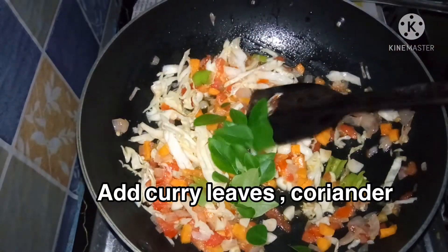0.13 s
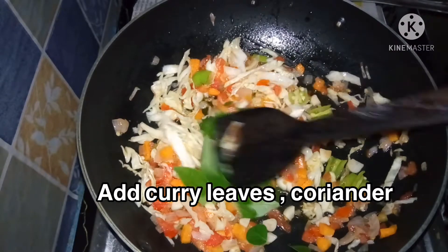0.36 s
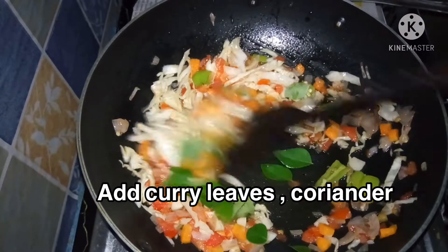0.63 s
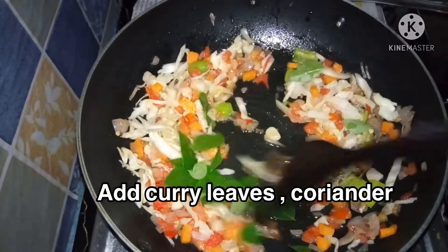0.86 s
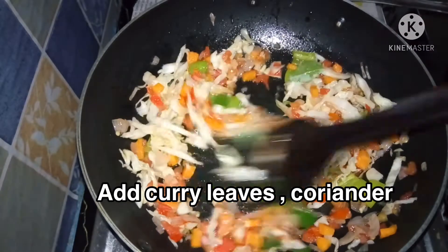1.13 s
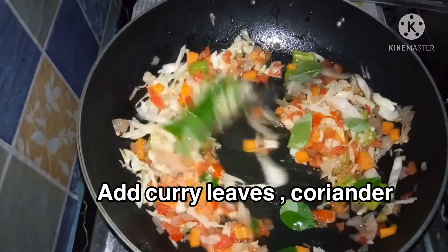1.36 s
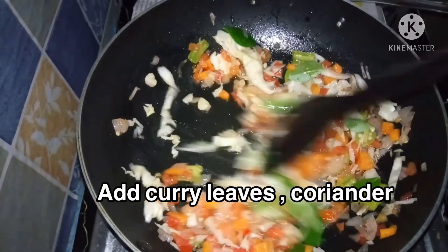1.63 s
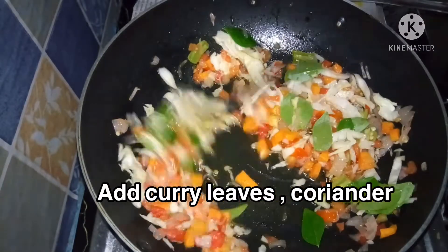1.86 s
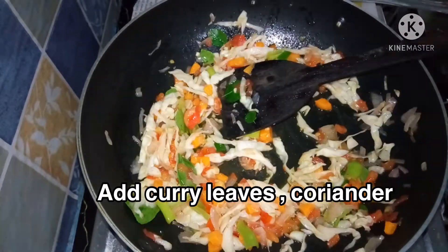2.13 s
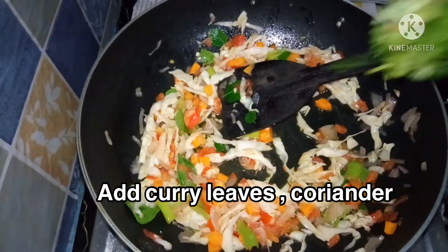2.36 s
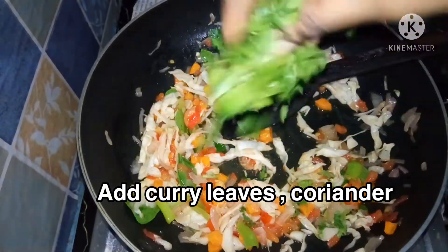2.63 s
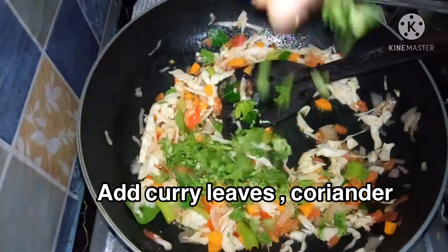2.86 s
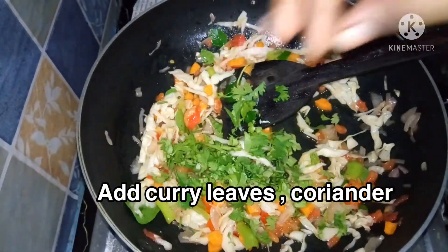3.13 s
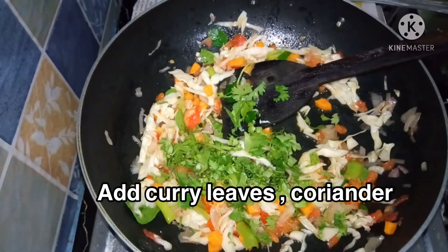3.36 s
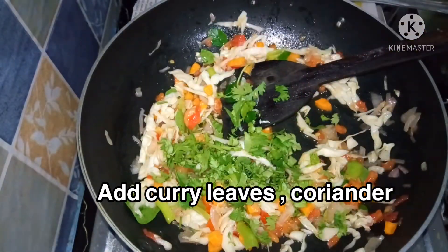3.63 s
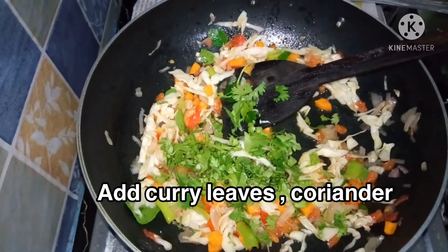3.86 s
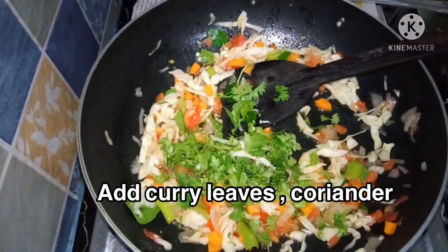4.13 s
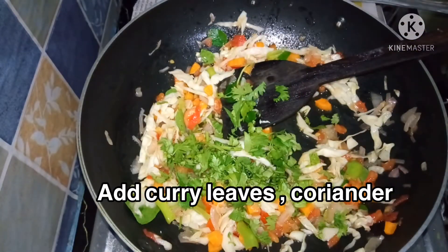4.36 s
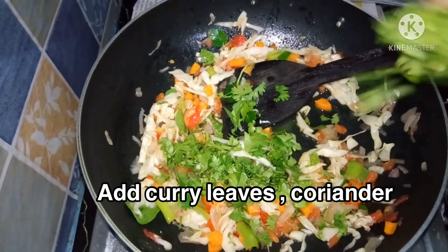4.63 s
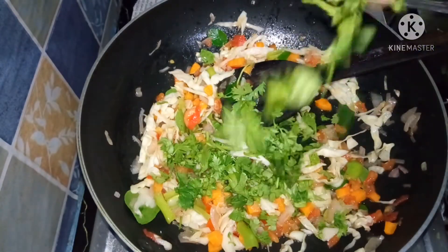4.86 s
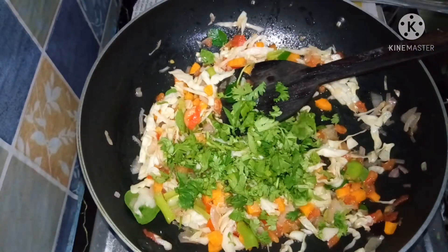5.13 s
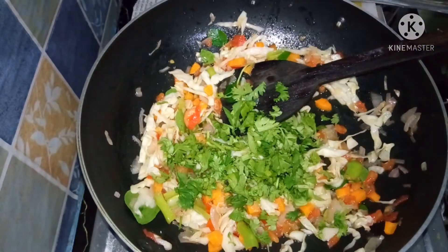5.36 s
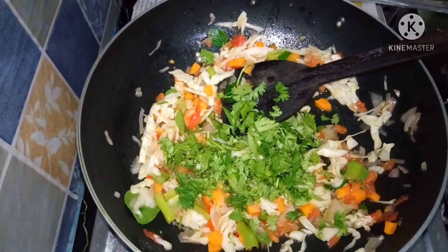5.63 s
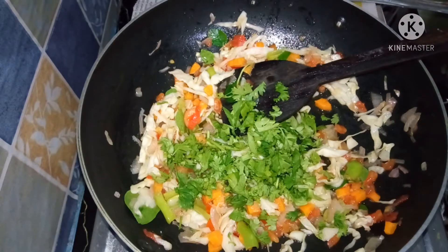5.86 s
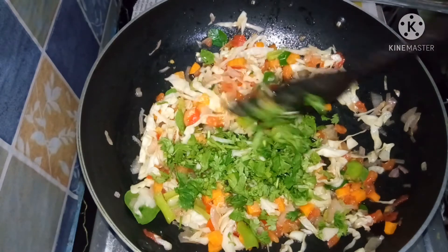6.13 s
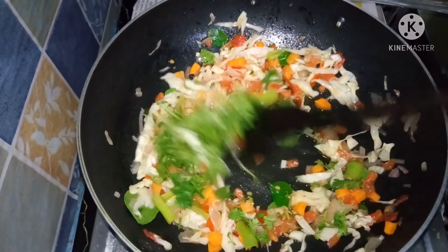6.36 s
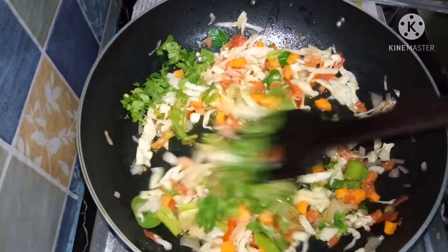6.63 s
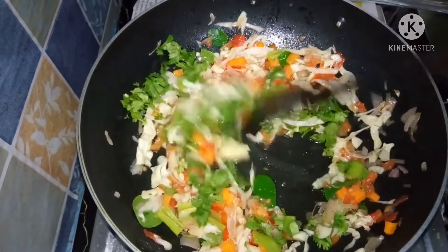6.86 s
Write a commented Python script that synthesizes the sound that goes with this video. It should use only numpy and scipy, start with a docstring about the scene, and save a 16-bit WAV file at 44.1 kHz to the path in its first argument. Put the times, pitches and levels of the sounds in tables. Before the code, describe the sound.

Close in a small kitchen, chopped vegetables sizzle brightly over a faint burner roar. A wooden spatula taps and scrapes the wok, ringing it briefly. Around two seconds the sound dips almost to silence and returns to undisturbed sizzling with snapping fat pops. Near six seconds something hard clacks down at the left, then the stirring knocks resume, ending on a heavy scrape. Phone-like stereo pickup.

```python
"""Vegetables sizzle in a wok: thousands of tiny steam bursts, coloured and unsteady, flaring now and then.
A burner roars low as filtered noise; fat pops as pitched blips; a wooden spatula taps the pan (decaying modes)
and scrapes it (grainy noise); something clacks on the counter (a resonant click) and the wok shifts on its stand.
A phone hears it at two ports of different colour and opposite polarity. An edit fades the sound out and in once."""
import sys
import numpy as np
from scipy import signal
from scipy.fft import rfft, irfft, next_fast_len
from scipy.io import wavfile
from scipy.ndimage import uniform_filter1d, map_coordinates

SR = 44100
rng = np.random.default_rng(int(sys.argv[2]) if len(sys.argv) > 2 else 0)


def level_to_linear(level):
    """Convert decibel levels to linear amplitude factors, elementwise."""
    exponent = np.asarray(level, float) / 20
    return 10 ** exponent


def waveform_to_disk(signal):
    """Save audio, clipped to [-1, 1], as 16-bit WAV at the path in sys.argv[1]."""
    frames = np.transpose(np.atleast_2d(signal))
    scaled = np.clip(frames, -1, 1) * 32767
    samples = np.round(scaled).astype(np.int16)
    wavfile.write(sys.argv[1], SR, samples)


N = 308259  # length in samples

# the bare wok's modes, the first two being one mode split in two: pitch_hz [Hz], level_db [dB], t60_s [s]
WOK_MODES = [(550.6, 0, 0.3), (594.3, -0.5, 0.21), (144.3, -20, 0.45), (303, -20, 0.14),
             (483.86, -14.5, 0.072), (653, -9, 0.045), (745, -7.5, 0.14), (818, -6.5, 0.045),
             (920, -11.5, 0.033), (1096.1, -11.5, 0.063), (1195.6, -5.5, 0.086), (1271.1, -14, 0.18),
             (1397.8, -9, 0.03548), (1800.6, -18, 0.063), (2525, -13.5, 0.034), (4340, -25, 0.04)]
# the edit: time_s [s], fade_out_s [s], fade_in_s [s]
EDIT = (2.07, 0.081, 0.16)


def unit(x):
    """Scaled to rms 1."""
    return x / np.sqrt(np.mean(x ** 2) + 1e-20)


def along(points, hz):
    """(Hz, value) points read on a log frequency axis."""
    f, v = np.transpose(points)
    return np.interp(np.log(hz + 1), np.log(f + 1), v)


def wobble(rate):
    """A smooth random curve with rate knots a second."""
    knots = rng.standard_normal(int(N * rate / SR) + 4)
    return map_coordinates(knots, [np.arange(N) * rate / SR])


def filtered(x, response):
    """x filtered by a complex response of frequency."""
    m = next_fast_len(N + SR // 2)
    return irfft(rfft(x, m) * response(np.fft.rfftfreq(m, 1 / SR)), m)[..., :N]


def resonant(peaks):
    """Causal response of (Hz, width Hz, dB) resonances, summed with alternating sign."""
    def response(f):
        return sum((-1) ** k * level_to_linear(db) * 1j * f * width / (hz * hz - f * f + 1j * f * width)
                   for k, (hz, width, db) in enumerate(peaks))
    return response


def pan_body(hardness_db=0):
    """The wok as resonances; a harder contact (dB per octave) favours the high modes."""
    first_hz = WOK_MODES[0][0]  # hardness tilts about the first listed mode
    return resonant([(hz, np.log(1000) / np.pi / t60, db + hardness_db * np.log2(hz / first_hz))
                     for hz, db, t60 in WOK_MODES])


def patchy(patchy_db):
    """Two unrelated noises under shared time-frequency patches of random gain."""
    z = signal.stft(rng.standard_normal((2, N)), nperseg=256)[2]
    field = uniform_filter1d(rng.standard_normal(z.shape[1:]), size=5, axis=0)
    field = uniform_filter1d(field, size=8, axis=1)
    return unit(signal.istft(z * level_to_linear(patchy_db * unit(field)), nperseg=256)[1][:, :N])


def bursts(count, spread_db, lag_spread):
    """Tiny bursts all over the pan, each with its own lag (samples) and strength between the ports."""
    at = rng.uniform(0, N - 1, count)
    size = rng.choice([-1, 1], count) * level_to_linear(spread_db * np.minimum(rng.exponential(1, count), 5.5))
    lag = lag_spread * rng.standard_normal(count)
    side_db = 3 * rng.standard_normal(count)

    def place(shift, db):
        return np.bincount(np.clip(at + shift, 0, N - 1).astype(int), size * level_to_linear(db), N)
    return unit(np.array([place(lag, side_db), place(0, -side_db)]))


def kitchen(x):
    """The room's answer: a noise tail in which each frequency dies at its own speed."""
    # the room's tail: pitch_hz [Hz], t60_s [s]
    room_decay = [(300, 0.2), (2000, 0.2487), (8000, 0.05)]
    hz, t, z = signal.stft(rng.standard_normal((2, SR // 2)), SR, nperseg=256)
    tail = signal.istft(z * level_to_linear(-60 * t / along(room_decay, hz)[:, None]), SR, nperseg=256)[1]
    late = np.pad(x, (200, 0))[None]
    return signal.fftconvolve(late, tail / np.linalg.norm(tail[0]), axes=1)[:, :N]


def sizzle():
    """Clumped bubble bursts of three sizes over a finer hiss; they also shake the pan a little."""
    # colour of the bursting steam bubbles: pitch_hz [Hz], gain_db [dB]
    fizz_colour = [(500, -35.5), (900, -25), (1200, -13), (1500, -18.5), (1900, -8.5), (2400, -14.5),
                   (3500, -10), (4300, -12), (5700, -7.5), (7600, 0.5), (9000, -4.5), (10600, -15.5),
                   (13000, -20.5), (15700, -21.5), (15900, -120)]
    # extra colour before the edit: pitch_hz [Hz], gain_db [dB]
    early_colour = [(400, 9), (1500, -2.5), (5000, -2), (10000, 0)]
    # wet food meets hot metal and the sizzle flares, or is lifted off and it sinks:
    # top_s [s], change_db [dB], length_s [s]
    flares = [(0.27, 1.5, 0.12), (0.56, 4, 0.084), (0.76, 3, 0.2), (1.293, 3, 0.084), (1.459, 3, 0.062),
              (1.687, 2, 0.1), (1.863, -1.5, 0.0487), (1.924, 4, 0.024), (4.31, 2.5, 0.13),
              (5.368, 1, 0.037), (6.46, 1, 0.057), (6.657, -3, 0.11), (6.769, 3.5, 0.063),
              (6.945, 4, 0.075)]
    rise_share = 0.61  # a flare rises in this share of the time it takes to fall
    # level before the edit; level just after it, climbing as the resting food heats through
    stirred_db, resting_db, heats_db_per_s = -41.5, -43.5, 0.43

    t = np.arange(N) / SR
    before_edit = t < EDIT[0]
    strength_db = np.where(before_edit, stirred_db, resting_db + heats_db_per_s * (t - EDIT[0]))
    for s, db, length in flares:
        side = np.where(t < s, rise_share, 1)
        strength_db = strength_db + db * np.exp(-((t - s) / length / side) ** 2)

    steam = 1.42 * patchy(patchy_db=2.5)
    for bubble_hz, bubble_db in (2500, 2.6), (5000, 6.4), (8000, 0.82):  # small bubbles ring higher
        clumps = level_to_linear(0.94 * wobble(30) + 1.0 * wobble(150))
        crowd = clumps * bursts(count=15000, spread_db=2, lag_spread=6)
        steam = steam + filtered(crowd, resonant([(bubble_hz, 0.49 * bubble_hz, bubble_db)]))
    unsteady_db = 0.54 * wobble(6.5) + 0.49 * wobble(20) + 0.3911 * wobble(40) + 0.35 * wobble(200)
    steam = level_to_linear(unsteady_db) * steam

    fizz = unit(filtered(steam, lambda hz: level_to_linear(along(fizz_colour, hz))))
    shaken_pan = unit(filtered(steam[1], pan_body(hardness_db=18.5)))
    fizz = fizz + level_to_linear(-43.5) * shaken_pan
    early = filtered(fizz, lambda hz: level_to_linear(along(early_colour, hz)))
    return level_to_linear(strength_db) * np.where(before_edit, early, fizz)


def roar():
    """Burner and kitchen: a low unsteady noise, nearly the same at both ports."""
    # colour of burner and kitchen: pitch_hz [Hz], gain_db [dB]
    roar_colour = [(20, -22), (60, -12.5), (105, -4), (143, -1.5), (190, -4.5), (270, -8), (400, -8),
                   (700, -8), (1300, -9), (2500, -35)]
    # level before the edit and after it: before_db [dB], after_db [dB]
    roar_levels = (-61, -58)
    a, b = filtered(patchy(patchy_db=2.5), lambda hz: level_to_linear(along(roar_colour, hz)))
    level_db = np.where(np.arange(N) / SR < EDIT[0], *roar_levels)
    level_db = level_db + 0.64 * wobble(2.9) + 0.58 * wobble(8.6)
    return level_to_linear(level_db) * unit(np.array([a + 0.2789 * b, a - 0.26 * b]))


def pops():
    """Single bursts of fat: a few cycles at the bubble's pitch over a duller body."""
    # loud fat pops: start_s [s], level_db [dB], pitch_hz [Hz]
    loud_pops = [(0.1062, -24, 7540), (0.5167, -26, 7800), (0.5821, -24, 7400), (1.3084, -27, 8110),
                 (2.366, -26, 6600), (3.6232, -26, 6500), (4.3181, -23.5, 7800), (4.3454, -24.5, 7900),
                 (4.5266, -27, 7270), (4.578, -27, 7590), (4.6493, -24, 7600), (4.7985, -19, 6800),
                 (5.0749, -15.5, 6000), (5.3657, -23, 7780), (5.4544, -29, 4500), (5.5614, -24, 6860),
                 (6.1674, -25, 6000), (6.2911, -25, 4600), (6.3215, -28, 6700)]
    # lesser pops fall at random
    small_count, small_db, small_spread_db, small_hz = 20, -29, 0.5, 7400

    t = np.arange(200) / SR
    ticks, bodies = np.zeros((2, N + 200)), np.zeros(N + 200)
    when, size, pitch = rng.uniform(0, 1, (small_count, 3)).T
    small_pops = np.transpose([when * (N - 200) / SR,
                               small_db + small_spread_db * (2 * size - 1),
                               small_hz * (0.9 + 0.2 * pitch)])
    rows = np.concatenate([loud_pops, small_pops])
    phases = rng.uniform(0, 2 * np.pi, (len(rows), 2, 1))  # each port hears its own phase
    for (s, db, hz), phase in zip(rows, phases):
        swell = np.exp(-((t - .002) * hz / 1.2) ** 2)
        ticks[:, round(s * SR):][:, :len(t)] += level_to_linear(db) * swell * np.sin(2 * np.pi * hz * t + phase)
        bodies[round((s + .0015) * SR)] = level_to_linear(db)
    return ticks[:, :N] + filtered(bodies[:N], resonant([(900, 900, -10), (2000, 1200, 7)]))


def taps():
    """Each blow rings the wok's modes, damped by the food on it, and adds the short crack of wood."""
    # spatula blows: start_s [s], ring_db [dB], hardness_db [dB]
    blows = [(0.245, -26.5, 0.5), (0.708, -30.5, 7.5), (.738, -28.5, 1.5), (1.012, -45.5, -16),
             (1.425, -43, 7), (1.448, -35.5, 15.5), (1.465, -39.5, 11.5), (1.483, -26, -6),
             (1.520, -26.5, -8), (1.668, -20.5, -2.5), (1.790, -39.5, -4), (1.9, -43, -6), (1.925, -37, 14),
             (1.950, -45, 2), (6.248, -53, 12), (6.430, -49, -2), (6.490, -27, 1), (6.930, -27, 6),
             (6.945, -20.5, -12), (6.961, -26, 0)]
    freedom = 0.64  # share of the bare wok's ring time that the food leaves
    spot_middle, spot_per_db = 0.54, 0.0394  # hard blows favour the upper mode of the pair (1), soft the lower (0)
    # the spatula stays pressed on the pan and stifles the ring: when, and how fast
    choke_s, stifled_s = 0.055, 0.015

    t = np.arange(SR // 2) / SR
    rings, cracks = np.zeros(N + SR), np.zeros((2, N + SR))
    hz, mode_db, t60 = np.transpose(WOK_MODES)[..., None]
    chance = np.clip(rng.standard_normal((len(blows), len(WOK_MODES), 1)), -1, 1)
    chance[:, :2] = 0  # the split pair is left to the spot
    choke = np.exp(-np.maximum(t - choke_s, 0) / stifled_s)
    onset = 1 - np.exp(-t / 0.00062)
    for (s, db, hardness_db), draw in zip(blows, chance):
        start = round(s * SR)
        spot = np.clip(spot_middle + spot_per_db * hardness_db, 0, 1)
        tilt_db = hardness_db * np.log2(np.maximum(hz / hz[0], 1)) / 2
        gain = level_to_linear(mode_db + 4 * draw + tilt_db)
        gain[:2, 0] *= np.cos(spot * np.pi / 2), -np.sin(spot * np.pi / 2)  # the pair starts opposed, then beats
        ring = (gain * level_to_linear(-60 * t / t60 / freedom) * np.sin(2 * np.pi * hz * t)).sum(0)
        rings[start:][:len(t)] += level_to_linear(db) * choke * ring * onset
        snap = rng.standard_normal(len(t)) + 0.99 * rng.standard_normal((2, len(t)))
        fall = level_to_linear(-60 * t / 0.0072) + level_to_linear(-9.0 - 60 * t / 0.096)  # a sharp edge, then the blade rattles out
        cracks[:, start:][:, :len(t)] += level_to_linear(db + hardness_db) * fall * snap
    wood = resonant([(915.9, 720, 1.0), (1900, 620, 2.5), (2464.1, 430, 5.5), (4312, 820, -11)])
    return rings[:N], filtered(cracks[:, :N], wood)


def strokes():
    """Wood dragged over the coating slips in uneven grains that swell and fade, heard through the pan."""
    # spatula strokes along the pan: start_s [s], length_s [s], dull_ring_db [dB], rasp_db [dB]
    drags = [(.5, 0.22, -40, -61), (0.705, 0.1, -23, -45), (1.02, 0.87, -34.5, -74),
             (1.448, 0.1163, -16, -45), (1.669, 0.076, -19, -45), (1.785, 0.093, -25.5, -47.5),
             (1.922, 0.072, -15, -45), (4.223, 0.08, -36, -42), (4.733, 0.047, -30.5, -47),
             (6.381, 0.3393, -33, -60), (6.745, 0.079, -20.5, -45.5), (6.861, 0.2467, -32, -74),
             (6.931, 0.082, -9, -32.5)]
    soft, hard = np.zeros((2, N + SR))
    for s, length, ring_db, rasp_db in drags:
        swell = np.sin(np.pi * np.linspace(0, 1, round(length * SR)) ** 0.45)
        soft[round(s * SR):][:len(swell)] += level_to_linear(ring_db) * swell
        hard[round(s * SR):][:len(swell)] += level_to_linear(rasp_db) * swell
    slips = level_to_linear(3.1 * wobble(120) + 1.6 * wobble(500))
    dull = filtered(soft[:N] * unit(slips * rng.standard_normal(N)), pan_body(hardness_db=-1.0))
    grit = unit(slips * (rng.standard_normal(N) + 1.7 * rng.standard_normal((2, N))))
    scrape = resonant([(1255, 260, 9.7), (2050, 530, 8.395), (3420, 2100, 4.3), (4500, 1100, 3.3)])
    return dull, filtered(hard[:N] * grit, scrape)


def clack():
    """A hard object set down off to the left: a click through its resonances, with the room behind it."""
    # the clack: start_s [s], level_db [dB], lag of the right port [samples]
    clack_event = (6.096, -1.1, 12)
    # the object's resonances: pitch_hz [Hz], width_hz [Hz], level_db [dB]
    object_body = [(1640, 390, 1.5), (2060, 360, 4.5), (5200, 1200, -2.5), (580, 263.7, -7), (248, 140, -9)]
    s, db, lag = clack_event
    blow = np.zeros(N)
    blow[round(s * SR):][:24] = level_to_linear(db) * np.hanning(24) * np.sin(np.linspace(0, 2 * np.pi, 24))
    knock = filtered(blow, resonant(object_body))
    return np.array([knock, np.roll(knock, round(lag))]) + level_to_linear(-8.5) * kitchen(knock)


def rock():
    """A short low grumble of resonant noise as the wok shifts on its stand."""
    # the shift: start_s [s], length_s [s], level_db [dB], pitch_hz [Hz]
    rock_event = (6.752, .06, -45, 200)
    s, length, db, hz = rock_event
    u = np.maximum(np.arange(N) / SR - s, 0) / length
    swell = 4 * np.e * u * np.exp(-4 * u)  # tops at 1 after a quarter of the length
    return level_to_linear(db) * swell * unit(filtered(rng.standard_normal(N), resonant([(hz, 0.3 * hz, 0)])))


def scene():
    """All sources at the two ports."""
    ring, crack = taps()
    dull, rasp = strokes()
    pan = ring + dull + rock()
    early = filtered(pan, lambda hz: np.exp(2j * np.pi * hz * .00006))  # the pan is nearer the left port
    spatula = np.array([early, pan]) + crack + rasp
    room = level_to_linear(-18.0) * kitchen(spatula[1])
    return spatula + room + clack() + sizzle() + pops() + roar()


def band_limit(x):
    """A steep low-pass at the top of the band."""
    return signal.sosfilt(signal.butter(12, 15790, fs=SR, output="sos"), x)


def record(dry):
    """The left port is coloured and inverted; the edit fades both ports almost to silence and back."""
    # colour of the left port: pitch_hz [Hz], gain_db [dB]
    left_colour = [(60, -1.5), (250, -1), (600, 0.04), (1150, -3.5), (1900, -.5), (3500, -4), (5500, -7.5),
                   (7300, -13.5), (9000, -4.5), (11000, 0), (15000, 2.5)]
    left = -filtered(dry[0], lambda hz: level_to_linear(along(left_colour, hz)))
    at, fade_out, fade_in = EDIT
    t = np.arange(N) / SR
    falling = (at - .012 - t) / fade_out
    rising = (t - at - .015) / fade_in
    fade = np.clip(np.maximum(falling, rising), .003, 1)
    mix = fade * np.array([left, dry[1]])
    return band_limit(mix)


dry = scene()
out = record(dry)
waveform_to_disk(out)
```